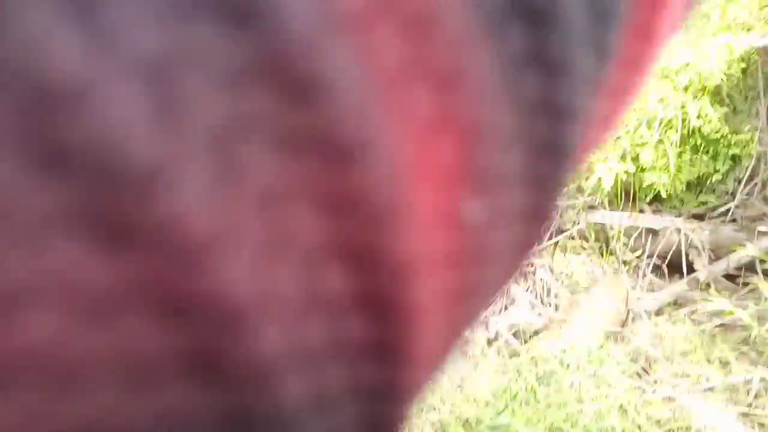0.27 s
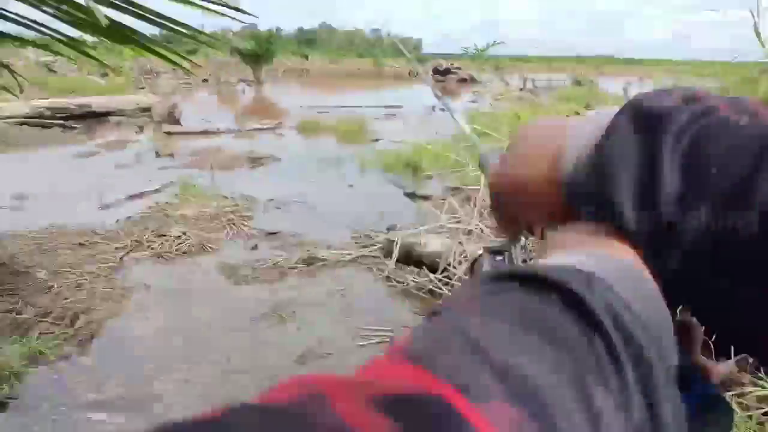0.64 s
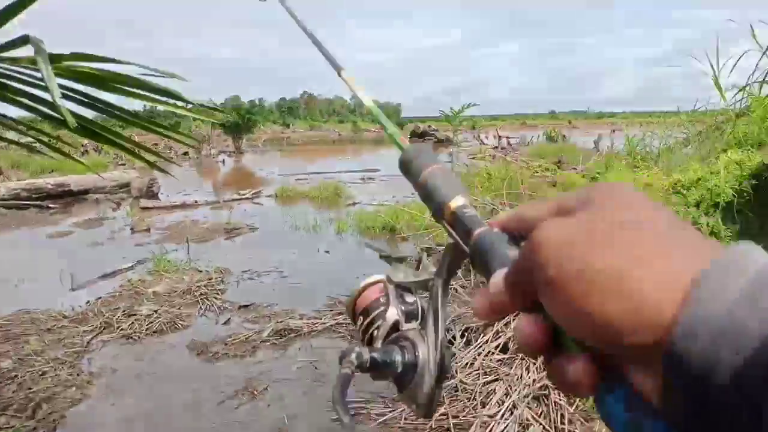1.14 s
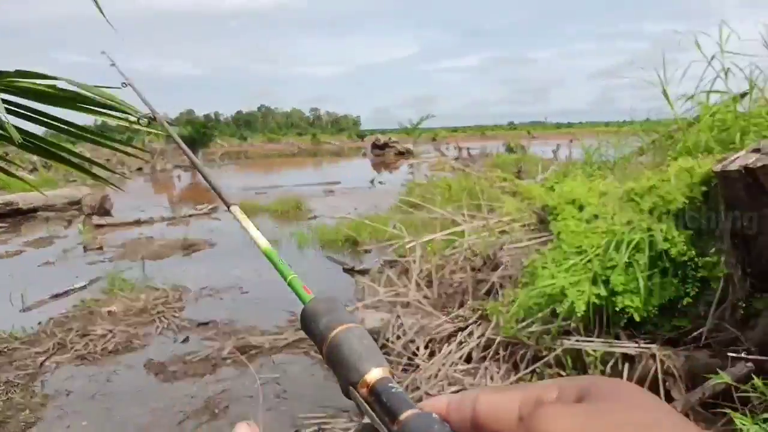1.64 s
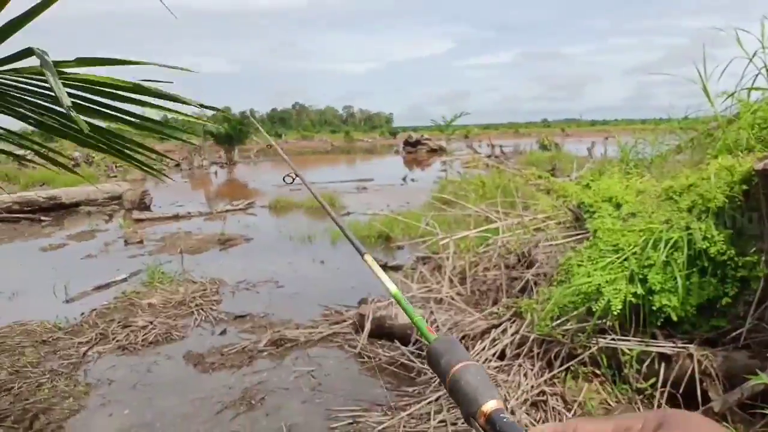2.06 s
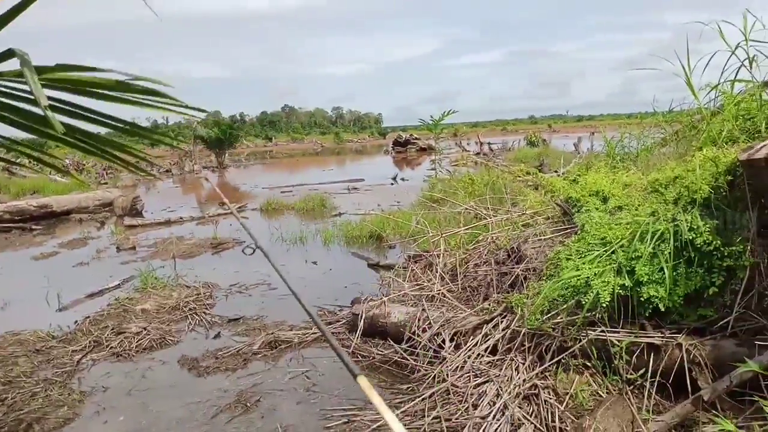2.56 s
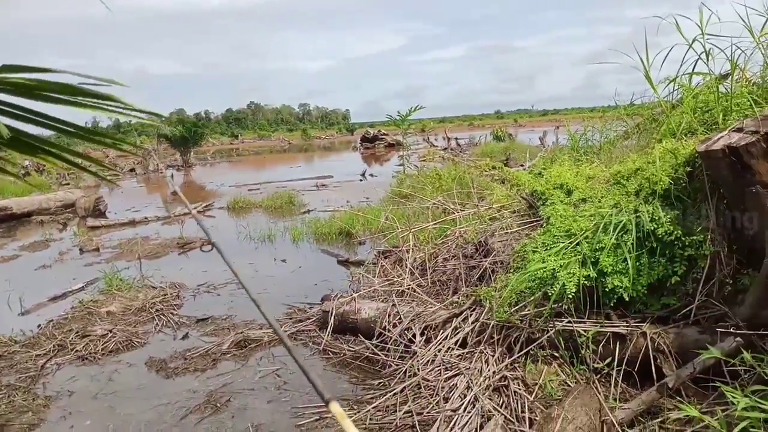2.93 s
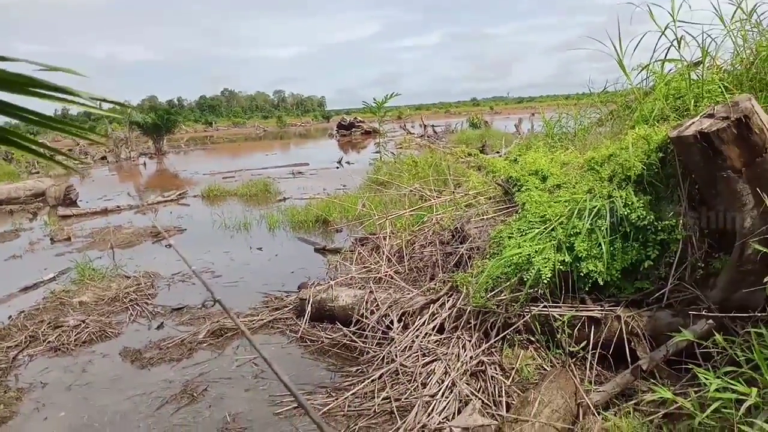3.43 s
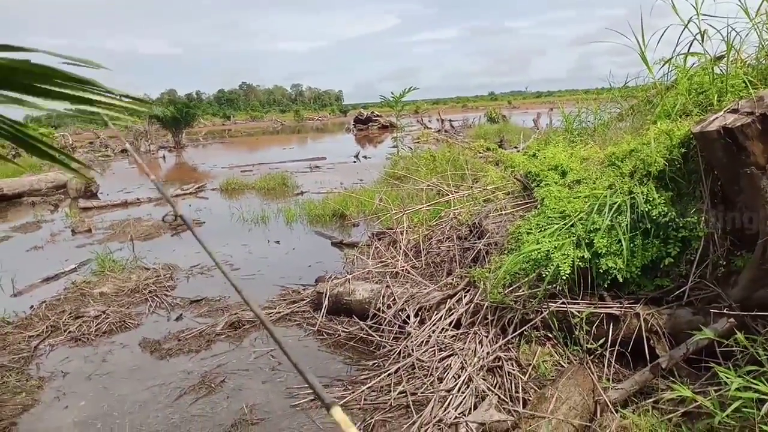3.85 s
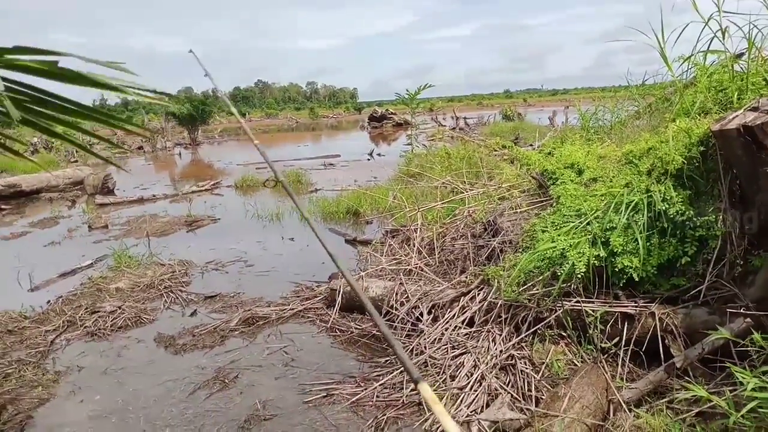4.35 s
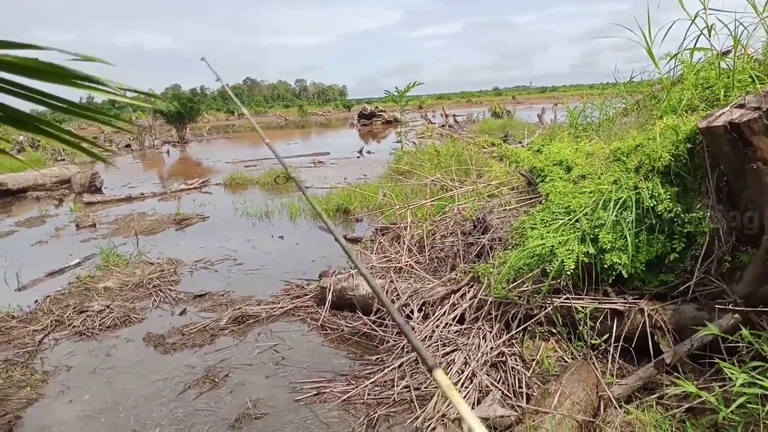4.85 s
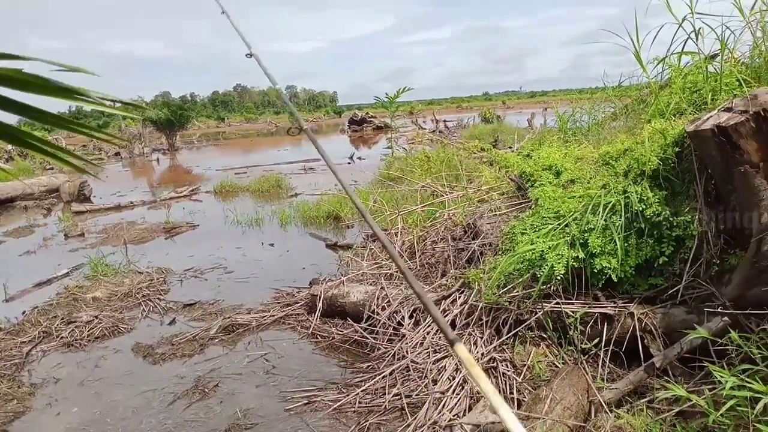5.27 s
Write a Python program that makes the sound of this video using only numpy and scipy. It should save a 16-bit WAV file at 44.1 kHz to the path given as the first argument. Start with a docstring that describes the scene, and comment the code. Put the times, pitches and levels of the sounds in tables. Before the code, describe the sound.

A sleeve drags loudly across a body-worn microphone as a fishing rod is cast. Line runs out with a ticking scrape that slows and fades, then the reel's bail snaps shut with a brief metallic ring. A few clicks, knocks and soft cloth rustles follow close by. All around, swamp insects hold a thin high whine over a soft hiss of air, with fluttering chirps repeating in the distance.

```python
"""A fishing rod and reel, cast on a swamp bank and heard from a camera worn by the angler.
A sleeve drags across the camera, the line runs out with a ticking scrape, the bail snaps shut and
rings the reel's frame, and the tackle clicks and knocks in the hand. Behind it, insects on nearly one
pitch beat into a whine over a soft hiss of air, and small animals chirp, peep and rasp far off."""
import sys
import numpy as np
from scipy import signal
from scipy.fft import rfft, irfft, next_fast_len
from scipy.io import wavfile
from scipy.ndimage import map_coordinates

SR = 44100
rng = np.random.default_rng(int(sys.argv[2]) if len(sys.argv) > 2 else 0)


def unload_wav(signal):
    """Save mono or channel-first audio to the path in sys.argv[1] as 16-bit WAV at rate SR, clipped to [-1, 1]."""
    wavfile.write(
        sys.argv[1],
        SR,
        np.round(np.clip(np.atleast_2d(signal).T, -1, 1) * 32767).astype(np.int16),
    )


N = 242550
BAIL_S = 1.8075  # bail snaps shut

# friction spectra of cloth and line, broad rub and high fizz: (frequency [Hz], rel. density [dB])
RUB_SPECTRUM = [(35, -35), (60, -6), (200, -0.5), (450, -0.5), (750, -1), (1300, -1.5), (2000, -2),
                (3500, -0.5), (4500, -7), (5200, -13), (7000, -19), (12000, -58)]
FIZZ_SPECTRUM = [(3000, -23), (6500, -10.5), (7500, -3.5), (8400, -.5), (9100, 0.5), (10400, -7.5),
                 (12000, -14), (14200, -15), (15100, -14)]


def amp(db):
    """Decibels to gain."""
    return 10 ** (np.asarray(db) / 20)


def unit(x):
    """Scale to rms 1."""
    return x / np.sqrt(np.mean(x ** 2) + 1e-20)


def tone(hz):
    """Sine following a per-sample frequency."""
    return np.sin(2 * np.pi * np.cumsum(hz) / SR)


def wobble(rate_hz):
    """Smooth random curve, rate_hz knots a second."""
    knots = rng.standard_normal(int(N * rate_hz / SR) + 4)
    return map_coordinates(knots, [np.arange(N) * rate_hz / SR])


def swell(s, half_s, db):
    """Bell-shaped gain centred on s."""
    return amp(db) * np.exp(-((np.arange(N) / SR - s) / half_s) ** 2)


def ramp_db(s, hold_s, rise_db_s, fall_db_s, db):
    """Level that climbs to db at time s, holds, then falls; slopes in dB/s."""
    t = np.arange(N) / SR
    return db - rise_db_s * np.maximum(s - t, 0) - fall_db_s * np.maximum(t - s - hold_s, 0)


def filtered(x, response):
    """Apply a complex frequency response."""
    size = next_fast_len(len(x) + 8192)
    return irfft(rfft(x, size) * response(np.fft.rfftfreq(size, 1 / SR)), size)[:len(x)]


def coloured(x, spectrum):
    """Apply a (frequency [Hz], gain [dB]) curve, interpolated in log frequency."""
    knots_hz, db = np.transpose(spectrum)
    return filtered(x, lambda hz: amp(np.interp(np.log(hz + 1), np.log(knots_hz), db)))


def resonant(x, modes):
    """Apply resonances of alternating sign: (centre [Hz], width [Hz], gain [dB])."""
    return filtered(x, lambda hz: sum(
        (-1) ** k * amp(db) * 1j * hz * width / (centre ** 2 - hz ** 2 + 1j * hz * width)
        for k, (centre, width, db) in enumerate(modes)))


def noise(spectrum, grain_db=0, grain_hz=300):
    """Coloured noise of rms 1, in grains of random strength."""
    return unit(coloured(rng.standard_normal(N) * amp(grain_db * wobble(grain_hz)), spectrum))


def evened(x, smooth):
    """Flatten the chance peaks and gaps of a noise; rms 1."""
    analytic = signal.hilbert(unit(x))
    return unit(analytic.real / (np.abs(analytic) + 0.57) ** smooth)


def add(track, s, sound):
    """Mix a sound in at time s."""
    part = track[max(round(s * SR), 0):][:len(sound)]
    part += sound[:len(part)]


def scattered(x, t60_s, wet_db):
    """Add a short diffuse echo of the surroundings."""
    t = np.arange(SR // 3) / SR
    tail = rng.standard_normal(len(t)) * amp(-60 * t / t60_s)
    return x + amp(wet_db) * signal.fftconvolve(x, tail / np.linalg.norm(tail))[:N]


def air():
    """Open air over the water, and a low rumble."""
    # (frequency [Hz], rel. density [dB])
    breeze_spectrum = [(20, -6), (60, 8.5), (250, 0), (500, -3), (1200, -5), (1700, -5), (2700, -11),
                       (3500, -6.5), (4300, -16), (5100, -23.5), (6600, -13.5), (9800, -22.5), (11500, -27),
                       (15000, -29)]
    rumble_spectrum = [(20, -9), (40, -7.5), (58, 6), (85, -4.5), (160, -10), (300, -11.5), (700, -39.5)]
    breeze = amp(-60 + 1.85 * wobble(3.016)) * noise(breeze_spectrum)
    return breeze + amp(-59 + 1.4 * wobble(4.04)) * noise(rumble_spectrum)


def singers(groups):
    """Insects on nearly one pitch beat together; the nearest dominates, so beats are shallow."""
    bands = lambda hz: sum(amp(db) / np.sqrt(spread) * np.exp(-((hz - pitch) / (2 * spread)) ** 2)
                           for pitch, spread, db in groups)
    return evened(filtered(rng.standard_normal(N), bands), smooth=0.2)


def insects():
    """Two choirs whine; above them, some buzzers pulse and others hold steady."""
    # choir loudness: (time [s], upper rel. level [dB], lower rel. level [dB])
    choir_levels = [(0, -59, -60), (1.15, -58.5, -58), (1.6, -57.5, -64.5), (2.2, -54, -59),
                    (2.7, -57.5, -61.5), (3.55, -66.5, -58), (3.85, -58.5, -59), (5.5, -61, -56.5)]
    # groups of singers: (pitch [Hz], spread [Hz], rel. level [dB])
    upper_choir = [(5742, 15.3, 10), (5620, 23, -14)]
    lower_choir = [(5598, 13.3, 4.5), (5670, 13, -5), (5460, 52, -4), (5440, 81, -34)]
    pulsing_buzzers = [(8330, 45, 0.5), (8060, 60, -3), (7860, 60, -4.5)]
    steady_buzzers = [(9070, 65, -2), (8550, 490, 4), (12500, 37, -15)]
    times_s, *levels_db = np.transpose(choir_levels)
    upper_db, lower_db = [np.interp(np.arange(N) / SR, times_s, db) for db in levels_db]
    whine = amp(upper_db - 0.3) * singers(upper_choir) + amp(lower_db - 2.5) * singers(lower_choir)
    pulse_hz = 16 + 0.33 * wobble(1.72)
    pulsing = unit(singers(pulsing_buzzers) * amp(4.2 * tone(pulse_hz)))
    return whine + amp(-68) * pulsing + amp(-66.5) * singers(steady_buzzers)


def sleeve():
    """Cloth rubs and crackles on cloth; in the cast it presses and drags on the camera's case."""
    # arm strokes: (centre [s], half length [s], rub [dB], fizz [dB])
    strokes = [(0.174, 0.27, -57.5, -57.5), (0.364, 0.082, -53, -52), (.62, .11, -50, -51.5),
               (1.152, 0.064, -52, -56.5), (1.487, 0.34, -63.5, -60), (2.213, 0.22, -58, -59),
               (2.53, 0.22, -55.5, -58.5), (2.91, 0.05, -53, -51), (3.082, .06, -61, -59.5),
               (3.318, 0.22, -59, -61), (3.9, 0.33, -61.5, -62), (5.182, .045, -59, -58.5)]
    # pressed case and dragged weave: (frequency [Hz], rel. density [dB])
    case_spectrum = [(36, -40), (58, -1), (110, -5.5), (300, -1), (480, -7), (740, 2), (1000, -5),
                     (1500, -8.5), (3000, -33)]
    weave_spectrum = [(400, -9), (1050, -16), (1700, -2), (2500, -0.5), (3600, -4.5), (4700, -12),
                      (6300, -17.5), (8600, -3.5), (10000, -12), (11500, -25), (15000, -21)]
    press_db = ramp_db(0.424, hold_s=0.0616, rise_db_s=646, fall_db_s=186, db=-33)
    swing_db = ramp_db(0.44, hold_s=0.0354, rise_db_s=450, fall_db_s=238, db=-35)
    drag_db = ramp_db(0.451, hold_s=0.0089, rise_db_s=520, fall_db_s=330, db=-21)
    rub_gain = amp(-66.5) + amp(swing_db - 11)  # resting floor plus arm swing
    fizz_gain = amp(-70.5) + amp(swing_db)
    for s, half_s, rub_db, fizz_db in strokes:
        rub_gain = np.hypot(rub_gain, swell(s, half_s, rub_db))
        fizz_gain = np.hypot(fizz_gain, swell(s, half_s, fizz_db))
    snags = (rng.random(N) < 45 / SR) * rng.standard_normal(N)  # about 45 a second
    crackle = amp(-19) * unit(coloured(snags, FIZZ_SPECTRUM))
    fizz = noise(FIZZ_SPECTRUM, grain_db=2.5, grain_hz=400) + crackle
    flicker = amp(1.3 * wobble(18))
    rub = noise(RUB_SPECTRUM, grain_db=2.5, grain_hz=400)
    press = amp(press_db) * noise(case_spectrum, grain_db=3.5)
    drag = amp(drag_db) * noise(weave_spectrum, grain_db=3, grain_hz=700)
    return flicker * (rub_gain * rub + fizz_gain * fizz) + press + drag


def chirps():
    """Far fluttering chirps, two pairs a phrase; each drops in pitch and levels out as it fades."""
    # (start [s], level [dB])
    phrases = [(-.151, -47.5), (1.122, -54), (1.738, -50), (2.334, -53), (3.019, -50), (3.635, -51),
               (4.238, -50.5), (4.835, -49.5), (5.436, -50.5)]
    lone_chirps = [(2.753, -53), (5.073, -50)]
    chirp_gap_s, pair_gap_s, accent_db = 0.045, 0.132, 2.5
    track, t = np.zeros(N), np.arange(SR // 20) / SR
    shape = (1 - np.exp(-t / 0.003)) * amp(-60 * t / 0.068)
    notes = [(s + pair * pair_gap_s + k * chirp_gap_s, db + k * accent_db)
             for s, db in phrases for pair in range(2) for k in range(2)]
    for s, db in notes + lone_chirps:
        glide_s = 0.01032 * np.exp(0.157 * rng.standard_normal())
        detune = 1 + 0.022 * rng.standard_normal()
        hz = (1420 + 1180 * np.exp(-t / glide_s)) * detune
        if s >= 0:
            add(track, s, amp(db) * shape * tone(hz))
    return scattered(track * amp(3 * wobble(450)), t60_s=0.15, wet_db=-6)


def tackle():
    """Each contact is a hard metal snap, a knock through the rod and a thin ring of the bail wire."""
    # (time [s], rel. snap [dB], rel. knock [dB], knock centre [Hz], knock t60 [s])
    contacts = [(0.275, -20.5, -41, 3500, .03), (1.7994, -7.5, -35, 3500, 0.03),
                (1.8064, -3.5, -20.5, 1800, .055), (1.8417, -36, -36.5, 950, 0.096),
                (1.87, -33, -30.5, 1100, 0.04), (1.8777, -19, -29.5, 1510, 0.023),
                (1.987, -33, -35.5, 2870, 0.032), (3.1728, -16, -24.5, 2200, 0.0086),
                (3.2438, -56, -27, 1710, 0.022), (3.302, -36, -32, 1900, 0.052),
                (3.3311, -9.5, -18.5, 1050, .033), (3.432, -60, -27.5, 1850, .018),
                (3.8312, -25.5, -32.5, 3500, .03), (3.839, -29, -35.5, 3400, .032),
                (4.0343, -30, -36, 1700, .03), (4.448, -41, -55, 3000, .02), (4.64, -43, -42, 2500, .045)]
    # (centre [Hz], width [Hz], gain [dB])
    rod_modes = [(764, 370, -4), (1163, 109, 5), (1610, 215, -1), (2360, 900, -6.5), (3570, 370, -0.5)]
    # (frequency [Hz], rel. density [dB])
    snap_spectrum = [(500, -42), (2500, -26), (4200, -6.5), (6200, -10.5), (7400, -7), (8500, 6),
                     (9400, -1), (10500, -2.5), (12300, -11), (15000, -19.5)]
    wire_hz, wire_t60_s = 12860, 0.07
    snaps, knocks, wire = np.zeros((3, N))
    t = np.arange(SR // 4) / SR
    snap_shape = (1 - np.exp(-t / 0.000084)) * (amp(-60 * t / 0.0043) + amp(-22.5 - 60 * t / 0.053))
    for s, snap_db, knock_db, centre_hz, t60_s in contacts + rattles(count=12) + bail_chatter(count=3):
        add(snaps, s, amp(snap_db - 6.5) * snap_shape)
        # the contact point favours some rod modes
        emphasis = [(centre_hz / 2, -7), (centre_hz, 0), (centre_hz * 2, -8), (centre_hz * 5, -10)]
        body = coloured(resonant(rng.standard_normal(len(t)), rod_modes), emphasis)
        knock_shape = amp(-60 * t / t60_s) + amp(-4 - 60 * t / 0.011)
        add(knocks, s, amp(knock_db - 10) * knock_shape * evened(body, smooth=0.96))
        add(wire, s, amp(snap_db - 40 - 60 * t / wire_t60_s) * np.sin(2 * np.pi * wire_hz * t))
    knocks = coloured(knocks, [(4000, -0.5), (5200, -25), (9000, -15)])  # the hand damps the treble
    metal = evened(noise(snap_spectrum), smooth=0.7)
    return scattered(snaps * metal + knocks + wire, t60_s=0.16, wet_db=-25)


def sleeve_swish():
    """The sleeve slides lightly, with a hollow ring, just before pressing on the camera."""
    slide_db = ramp_db(0.338, hold_s=0.12, rise_db_s=380, fall_db_s=1000, db=-45)
    friction = rng.standard_normal(N) * amp(2.4 * wobble(400))
    hollow = resonant(friction, [(1620, 350, -1), (3750, 550, -1.5)])
    return amp(slide_db) * unit(coloured(hollow, [(600, -10), (1400, 4), (4000, -1.5), (6500, -8)]))


def line_scrape():
    """Line runs, then coasts, hissing and ringing the tackle; its ticking catches thin as it slows."""
    # (time [s], rel. ring [dB], rel. tick [dB])
    hard_catches = [(.591, -38.5, -48), (.67, -43, -27), (.682, -36.5, -29), (0.7052, -33.5, -29),
                    (.7197, -33, -36), (.748, -37, -32), (.7825, -35, -34), (.798, -32, -40),
                    (0.8158, -35.5, -38), (.869, -35.5, -42), (.918, -37.5, -46), (.9685, -40, -46),
                    (1.096, -44, -46), (1.186, -38, -37), (1.31, -41.5, -50)]
    # (centre [Hz], width [Hz], gain [dB])
    tackle_modes = [(730, 147, -7.5), (2050, 110, -5.5), (2430, 230, -2.5), (2908, 136, -0.5),
                    (4430, 290, -14)]
    fast_db = ramp_db(0.63, hold_s=0.17, rise_db_s=120, fall_db_s=184, db=-48.5)
    coast_db = ramp_db(0.63, hold_s=0.4, rise_db_s=150, fall_db_s=32.5, db=-58.5)
    run_db = 20 * np.log10(amp(fast_db) + amp(coast_db))
    slowing_db = run_db - run_db.max()
    catches_per_s = 85 * amp(slowing_db / 2)
    caught = rng.random(N) < catches_per_s / SR
    pushes = caught * amp(run_db + 9 - 0.31 * slowing_db) * rng.uniform(0.5, 1, N)
    ticks = amp(-1) * pushes
    for s, ring_db, tick_db in hard_catches:
        add(pushes, s, amp([ring_db - 1.5]))
        add(ticks, s, amp([tick_db - 2]))
    t = np.arange(SR // 40) / SR
    pulses = lambda x, rise_s: signal.fftconvolve(x, t / rise_s * np.exp(1 - t / rise_s))[:N]
    ringing = lambda: resonant(rng.standard_normal(N), tackle_modes)
    drag = amp(run_db + 3.2 * wobble(250)) * evened(ringing(), smooth=0.62)
    fizz_db = run_db.max() + 1.5 + 0.57 * slowing_db  # outlasts the scrape
    fizz = amp(fizz_db) * noise(FIZZ_SPECTRUM, grain_db=3, grain_hz=500)
    rub = amp(run_db - 6.5) * noise(RUB_SPECTRUM, grain_db=2, grain_hz=400)
    catch_rings = pulses(pushes, rise_s=0.00094) * evened(ringing(), smooth=1)
    catch_ticks = pulses(ticks, rise_s=0.00039) * evened(noise(FIZZ_SPECTRUM), smooth=0.43)
    return drag + fizz + rub + catch_rings + catch_ticks


def rattles(count):
    """Contact rows for faint random ticks of the held tackle."""
    from_s, to_s, centre_hz, t60_s = 1, 5.3, 2400, 0.03
    return [(rng.uniform(from_s, to_s), rng.uniform(-45.5, -40.5), rng.uniform(-48, -43), centre_hz, t60_s)
            for _ in range(count)]


def arm_bumps():
    """The arm bumps softly against the body."""
    # (time [s], pitch [Hz], rel. level [dB])
    bumps = [(1.311, 161, -43), (1.579, 103, -35.5), (2.645, 238, -43.5), (2.676, 149, -46)]
    track, t = np.zeros(N), np.arange(SR // 4) / SR
    shape = (t / 0.0047) ** 2 * np.exp(-t / 0.0047)
    for s, hz, db in bumps:
        add(track, s, amp(db) * shape * np.sin(2 * np.pi * hz * t))
    return track


def reel_frame():
    """The reel's frame rings under the bail's blow."""
    # (frequency [Hz], level [dB], t60 [s])
    frame_modes = [(180, -42, 0.11), (260, -36, 0.1), (753, -41, 0.12), (896, -32.5, 0.068),
                   (956, -38, 0.1), (1060, -38, 0.1), (1610, -31.5, 0.047)]
    track, t = np.zeros(N), np.arange(SR // 4) / SR
    ring = sum(amp(db - 60 * t / t60_s) * np.sin(2 * np.pi * (hz * t + rng.random()))
               for hz, db, t60_s in frame_modes)
    add(track, BAIL_S, ring * (1 - np.exp(-t / 0.0038)))
    return track


def bail_chatter(count):
    """Contact rows for the bail bouncing on its stop, each snap weaker."""
    gap_s, loss_db, centre_hz, t60_s = 0.004, 7, 720, 0.089
    return [(BAIL_S + (k + 1) * gap_s, -15 - k * loss_db, -27.5, centre_hz, t60_s) for k in range(count)]


def peeps():
    """Far birds: thin, unsteady whistles sliding upward."""
    # (start [s], length [s], start pitch [Hz], end pitch [Hz], rel. level [dB])
    whistles = [(2.26, .09, 4400, 5500, -66), (2.622, 0.043, 4600, 5230, -67),
                (2.67, 0.052, 4850, 5000, -63), (3.725, .035, 4700, 5400, -63),
                (3.76, 0.037, 4750, 5400, -61), (4.032, 0.011, 2950, 4340, -42.5),
                (4.034, 0.01, 6200, 8350, -46.5), (4.062, 0.063, 5040, 6400, -67),
                (4.48, 0.053, 5500, 6300, -68), (4.92, .05, 5700, 6800, -69)]
    track = np.zeros(N)
    for s, length_s, start_hz, end_hz, db in whistles:
        progress = np.linspace(0, 1, int(length_s * SR))
        arch = np.sqrt(np.abs(np.sin(np.pi * progress)))
        add(track, s, amp(db - 1.5) * arch * tone(start_hz + (end_hz - start_hz) * progress))
    return scattered(track * amp(3 * wobble(250)), t60_s=0.1, wet_db=-7)


def rasps():
    """Hoarse far calls swell and fade in one throat resonance."""
    # (centre [s], half length [s], level [dB])
    calls = [(4.04, 0.039, -59), (4.176, 0.044, -57), (4.32, .04, -59.5), (4.897, .035, -64)]
    # (frequency [Hz], rel. density [dB])
    throat_spectrum = [(2700, -14), (3350, -2), (3800, -2), (4250, -5), (4800, -23)]
    return sum(swell(*call) for call in calls) * noise(throat_spectrum)


def lone_insect():
    """One faint insect joins briefly, its thin note fluttering and drifting."""
    # (centre [s], half length [s], level [dB])
    songs = [(4.4, .4, -72)]
    flutter = amp(4 * wobble(45))
    hz = 5400 + 22 * wobble(2.4) + 22 * wobble(90)
    return sum(swell(*song) for song in songs) * unit(flutter * tone(hz))


def scene():
    """Swamp and angler, mono."""
    swamp = air() + insects() + lone_insect() + chirps() + peeps() + rasps()
    angler = sleeve() + sleeve_swish() + line_scrape() + tackle() + arm_bumps() + reel_frame()
    return (swamp + angler)[None]


def record(dry):
    """The camera rolls off deep bass and cuts everything above its band limit."""
    low_hz, top_hz = 41.7, 15600
    response = lambda hz: (hz < top_hz) / np.sqrt(1 + (low_hz / (hz + 1)) ** 8)
    return np.array([filtered(channel, response) for channel in dry])


dry = scene()
out = record(dry)
unload_wav(out)
```